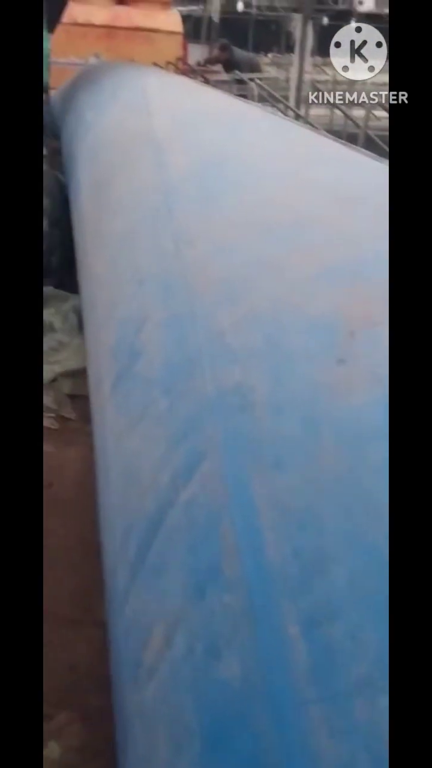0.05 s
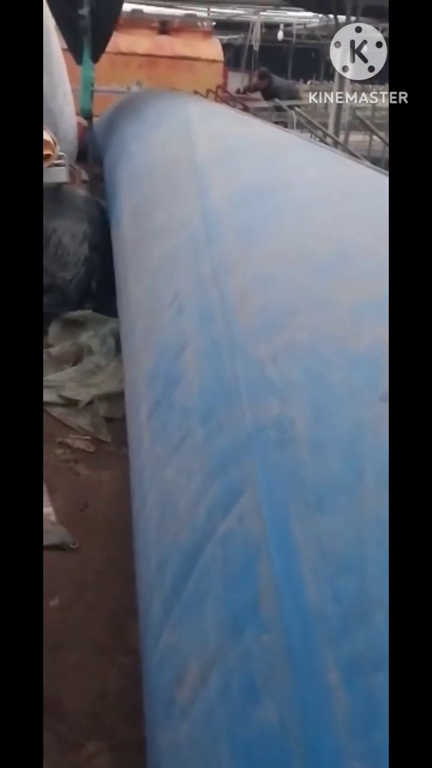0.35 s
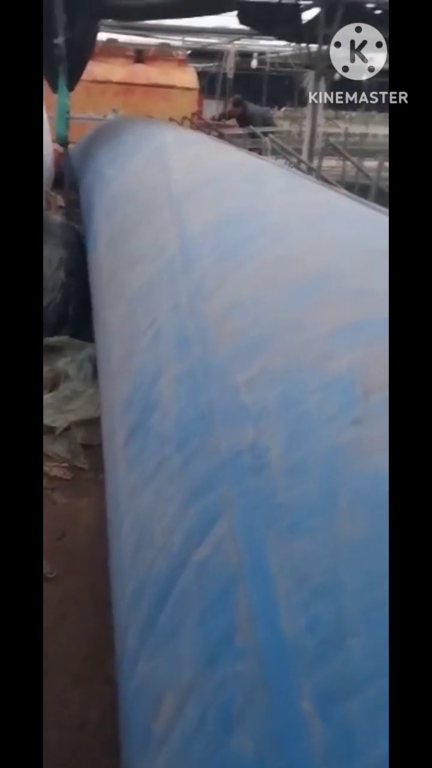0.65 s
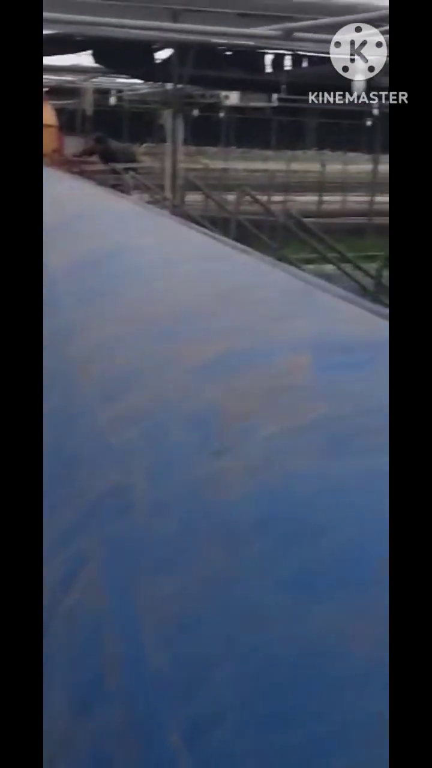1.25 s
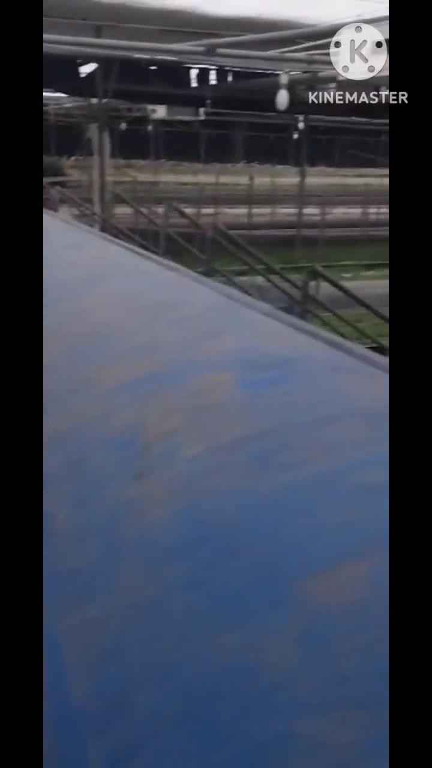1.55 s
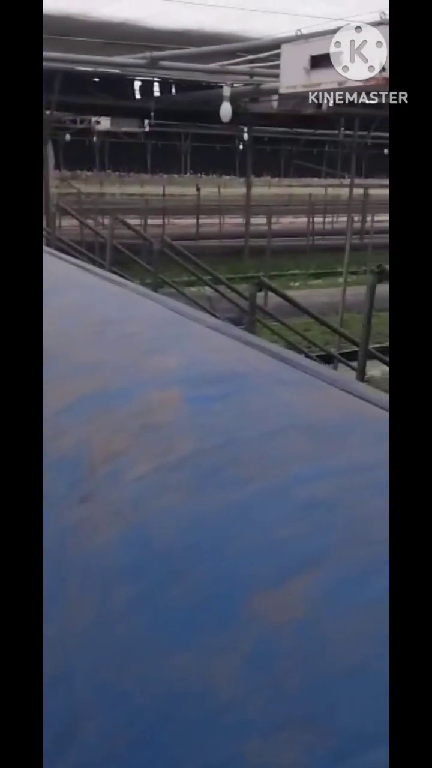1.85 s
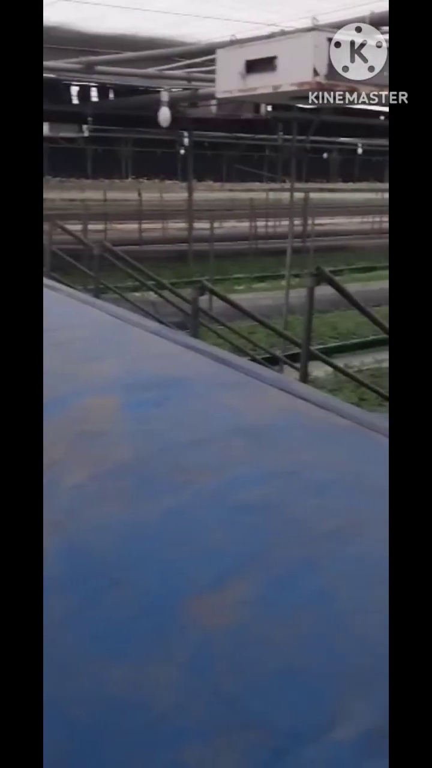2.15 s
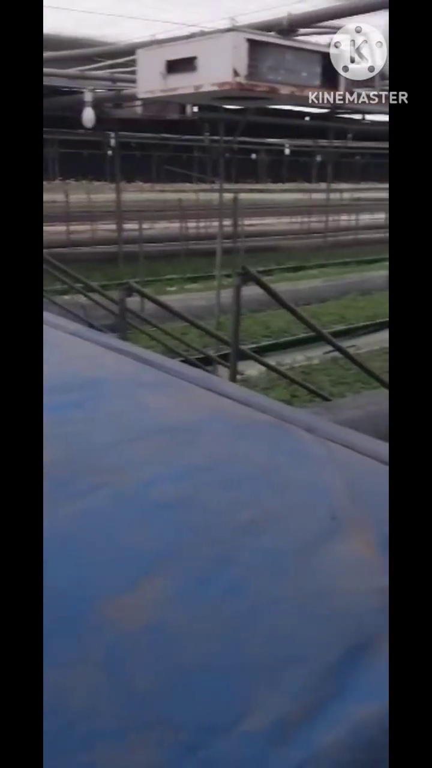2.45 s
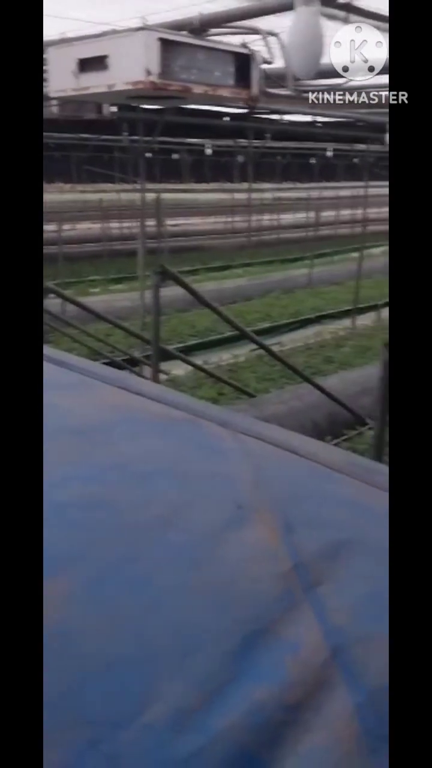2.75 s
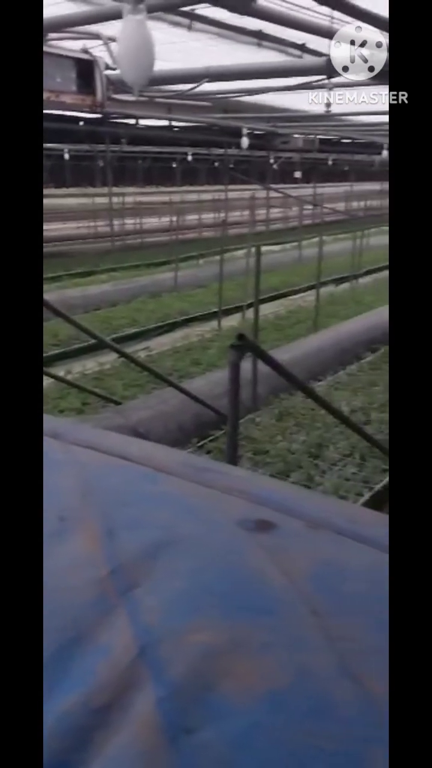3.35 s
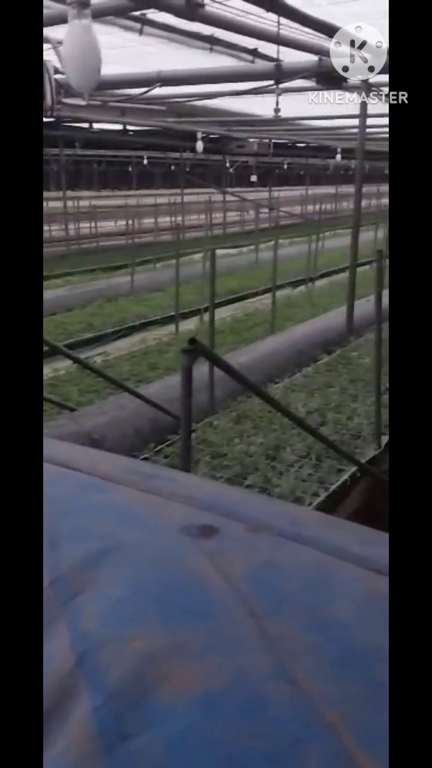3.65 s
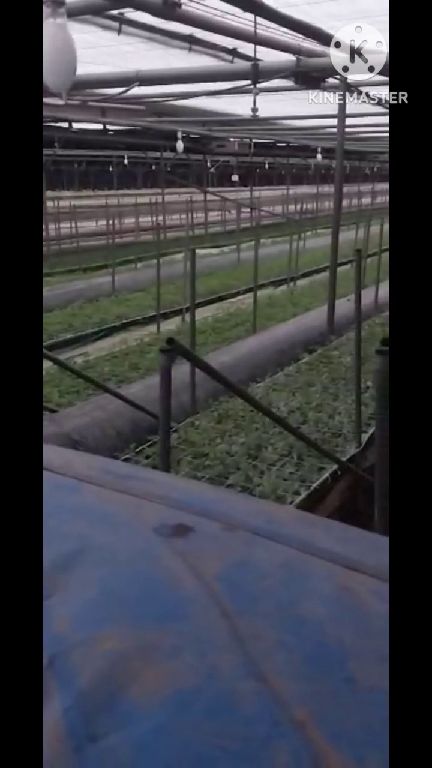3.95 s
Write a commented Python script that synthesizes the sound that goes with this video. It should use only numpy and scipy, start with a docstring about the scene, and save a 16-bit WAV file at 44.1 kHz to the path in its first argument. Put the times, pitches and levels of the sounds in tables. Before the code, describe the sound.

A low, throbbing machine drone fills a large greenhouse throughout, with a thin motor hum, wide fan rush and faint hiss. Short splashy spurts of water come evenly, about three a second, until 1.3 seconds. They pause, then crowd together from about 2.1 seconds to the end at 4. Occasional ticks and light clacks accompany them, with faint thumps near 0.9 and 3 seconds.

```python
"""A low machine drone throbs in a large greenhouse, with a thin motor hum and a wide rush of fan air.
The drone is one wavering tone inside the boom of the hall; the hum is three orders of a turning shaft.
Short splashy swishes of spray and ringing droplets, as of spurting water, come evenly at first,
pause, then crowd together. Now and then a tick, a light clack or a faint thump comes with one,
each a short burst of noise in its own band. A faint steady hiss sits on top."""
import sys
import numpy as np
from scipy import signal
from scipy.fft import rfft, irfft
from scipy.io import wavfile
from scipy.ndimage import uniform_filter1d

SR = 44100
rng = np.random.default_rng(int(sys.argv[2]) if len(sys.argv) > 2 else 0)


def file_out(sig):
    """Save sig as 16-bit WAV at sys.argv[1]."""
    # one column per channel
    cols = np.atleast_2d(sig).T
    # limit, then scale
    lim = np.clip(cols, -1, 1)
    pcm = np.round(lim * 32767).astype(np.int16)
    wavfile.write(sys.argv[1], SR, pcm)


N = 176400
T = np.arange(N) / SR
FREQS = np.fft.rfftfreq(N, 1 / SR)


def amp(db):
    """Decibels to gain."""
    return 10 ** (np.asarray(db) / 20)


def unit(x):
    """Scales to rms 1."""
    return x / np.sqrt(np.mean(x ** 2) + 1e-20)


def automation(points, t=T):
    """Draws straight lines between breakpoints in time."""
    return np.interp(t, *np.transpose(points))


def over_spectrum(points):
    """Draws straight lines between breakpoints in log frequency."""
    hz, value = np.transpose(points)
    return np.interp(np.log(FREQS + 1), np.log(hz + 1), value)


def wander(rate_hz):
    """Smooth random modulation of rms 1, rolled off above the given rate."""
    return unit(irfft(rfft(rng.standard_normal(N)) * (FREQS > 0) / (1 + (FREQS / rate_hz) ** 4), N))


def stereo_spectra(correlation):
    """Left and right noise spectra, as alike at each frequency as the table says."""
    shape = (2, len(FREQS))
    left, other = rng.standard_normal(shape) + 1j * rng.standard_normal(shape)
    alike = np.clip(over_spectrum(correlation), -1, 1)
    return np.array([left, alike * left + np.sqrt(1 - alike ** 2) * other])


def panned(x, left_db):
    """Pans a sound by its left minus right level."""
    return x * amp(left_db * np.array([[.5], [-.5]]))


def swell(peak_s, attack_s, decay_s):
    """An exponential rise and fall around a peak; attack and decay are time constants."""
    return np.exp(-abs(T - peak_s) / np.where(T < peak_s, attack_s, decay_s))


def knocks(hits, band_hz, attack_s, decay_s):
    """Short dead blows: noise in one band that starts quickly and dies away."""
    bandpass = signal.butter(2, band_hz, "band", fs=SR, output="sos")
    envelope = sum(amp(db) * swell(peak_s, attack_s, decay_s) for peak_s, db in hits)
    return envelope * unit(signal.sosfilt(bandpass, rng.standard_normal(N)))


# The drone's throb. Each row: time in seconds, level in dB before the trim.
DRONE_THROB = [(0,-38),(.03,-15.5),(.1,-33),(.17,-34),(.21,-14),(.25,-23),(.31,-38),(.39,-16),(.42,-36),(.5,-19),(.54,-32),(.6,-39),(.69,-19),(.75,-22),(.8,-14.5),(.84,-25.5),(.88,-21),(.92,-35),(1.04,-17.5),(1.1,-37),(1.14,-16),(1.2,-14.5),(1.3,-22.5),(1.35,-39),(1.4,-17.5),(1.54,-21.5),(1.6,-30),(1.67,-28.5),(1.73,-18.5),(1.82,-17),(1.87,-27),(1.9,-18),(1.96,-16),(2.06,-25.5),(2.18,-15.5),(2.22,-23.5),(2.25,-18),(2.32,-16),(2.38,-28),(2.43,-14.5),(2.49,-17),(2.52,-26),(2.58,-24),(2.63,-17.5),(2.67,-23),(2.71,-39),(2.76,-19),(2.81,-29),(2.86,-18),(2.91,-40),(2.96,-27),(3.0,-34),(3.04,-21.5),(3.12,-20.5),(3.17,-18.5),(3.21,-27.5),(3.26,-23.5),(3.35,-18),(3.4,-28),(3.61,-23.5),(3.66,-32),(3.72,-22.5),(3.78,-22.5),(3.82,-34),(3.91,-18),(4,-39)]
# The drone's waver. Each row: time in seconds, pitch in Hz.
DRONE_PITCH = [(0,110),(.2,112.8),(.48,114.1),(.58,109),(.7,114.6),(.85,104.6),(.96,112.8),(1.07,111.1),(1.15,106.2),(1.3,106.8),(1.48,106),(1.75,106.5),(1.88,109.7),(1.98,107.2),(2.05,112.7),(2.14,108),(2.55,108.8),(2.8,107.6),(3.0,106.7),(3.13,111.1),(3.22,107.2),(3.34,112.1),(3.45,106.1),(3.6,108.6),(3.73,104.6),(3.88,110.6)]


def drone(trim_db=.04, octave_db=-29.5, boom_hz=115, boom_width_hz=24, boom_db=-41):
    """One low tone throbs and wavers while the hall booms around it in a narrow band of noise."""
    phase = 2 * np.pi * np.cumsum(automation(DRONE_PITCH)) / SR
    tone = np.sqrt(2) * (np.sin(phase) + amp(octave_db) * np.sin(2 * phase))
    resonance = 1 / (1 + (2 * (FREQS - boom_hz) / boom_width_hz) ** 2)
    boom = unit(irfft(rfft(rng.standard_normal(N)) * resonance, N))
    return amp(automation(DRONE_THROB) + trim_db) * tone + amp(boom_db) * boom


# The hum's partials. Each row: multiple of the shaft rate, level in dB before the fader.
SHAFT_ORDERS = [(1,-39.5),(2,-38.5),(3,-51.5)]
# The fader ride on the whole hum. Each row: time in seconds, gain in dB.
HUM_FADER = [(0,9.5),(.15,-4.5),(.65,5),(1.05,3.5),(1.35,-1),(1.6,-10.5),(1.9,-8),(2.15,3.5),(2.4,-1),(2.82,5),(3.2,-1),(3.4,1),(3.6,3.5),(4,-4)]


def motor_hum(shaft_hz=145.1, speed_drift=.00088, waver_db=1):
    """Orders of a turning shaft, each wavering in level on its way through the hall."""
    speed_hz = shaft_hz * (1 + speed_drift * wander(rate_hz=4.9))
    phase = 2 * np.pi * np.cumsum(speed_hz) / SR
    hum = 0
    for order, db in SHAFT_ORDERS:
        waver = amp(waver_db * wander(rate_hz=1.1))
        hum += amp(db) * unit(waver * np.sin(order * phase + 2 * np.pi * rng.random()))
    return amp(automation(HUM_FADER)) * hum


# The air's EQ. Each row: frequency in Hz, relative spectral level in dB.
AIR_EQ = [(20,-33),(32,-28),(48,-7),(80,-4.5),(110,6),(137,5),(160,-8.5),(185,-1.5),(210,1.5),(255,0.4),(305,-4.5),(410,-10),(470,-6),(570,-14),(830,-12),(1300,-18.5),(2100,-22.5),(3000,-28.5),(4200,-30.5),(5600,-35.5),(7400,-39),(8500,-48.5),(10500,-43),(12500,-42.5),(15000,-51)]
# Narrow lows, wide highs. Each row: frequency in Hz, left-right correlation (1 is mono).
AIR_CORRELATION = [(30,.97),(60,.99),(130,.99),(290,.9),(640,.64),(1400,.38),(3000,0),(15000,.05)]
# Where the air leans. Each row: frequency in Hz, left minus right in dB.
AIR_BALANCE = [(100,2),(350,-3.5),(690,1.5),(1300,-1.5),(4400,-2.5),(14000,-0.5)]
# The ride on the air's high shelf. Each row: time in seconds, shelf gain in dB.
AIR_TREBLE = [(0,3),(.6,2),(.75,1),(1,3),(1.45,0),(1.95,-0.5),(2.2,3),(2.9,2.5),(4,2.5)]


def fan_air(level_db=-26, shelf_hz=2150, patchy_db=.76, flicker_db=.5):
    """Wide fan noise, slightly patchy, whose treble flickers, sinks and returns."""
    lean_db = over_spectrum(AIR_BALANCE) / 2
    eq = amp(over_spectrum(AIR_EQ) + np.array([lean_db, -lean_db]))
    air = irfft(stereo_spectra(AIR_CORRELATION) * eq, N)
    hz, times, frames = signal.stft(air, SR, nperseg=512)
    # Random gains, smeared over 8 frames and 6 bins, make the patches.
    speckle = rng.standard_normal((len(times), len(hz)))
    patches = unit(uniform_filter1d(uniform_filter1d(speckle, size=8, axis=0), size=6, axis=1)).T
    shelf = (hz ** 2 / (hz ** 2 + shelf_hz ** 2))[:, None]
    treble_db = automation(AIR_TREBLE, times) + flicker_db * rng.standard_normal(len(times))
    frames = frames * amp(patchy_db * patches + shelf * treble_db)
    return amp(level_db) * unit(signal.istft(frames, SR)[1][:, :N])


def hiss(level_db=-60.5, band_hz=(10100, 14400)):
    """Faint, even top-end hiss, unrelated in each ear and stronger on the right."""
    bandpass = signal.butter(3, band_hz, "band", fs=SR, output="sos")
    noise = unit(signal.sosfilt(bandpass, rng.standard_normal((2, N))))
    return panned(amp(level_db) * noise, left_db=-8)


def droplets(drops_per_s=900, spread_db=7, range_hz=(1216, 7100), pitches=24, decay_cycles=7.8):
    """Drops of many sizes patter as tiny rings, each pitch with a random phase in each ear."""
    patter = np.zeros((2, N))
    for hz in np.geomspace(*range_hz, pitches):
        cycles = T[:1200] * hz
        lands = rng.random(N) < drops_per_s / pitches / SR
        sizes = amp(spread_db * np.minimum(rng.exponential(1, N), 3))
        for ear in patter:
            ring = np.exp(-cycles / decay_cycles) * np.sin(2 * np.pi * (cycles + rng.random()))
            ear += signal.oaconvolve(lands * sizes, ring)[:N]
    return unit(patter)


# The swish cues. Each row: peak time in seconds, level in dB, attack in seconds, decay in seconds,
# brightness in dB (half lifts the treble, half cuts the body).
SWISH_CUES = [(.089,-34.5,0.011,0.017,1),(0.363,-33,0.014,0.027,1),(.625,-41,.03,0.017,10),(0.657,-31.5,0.01,0.012,0),(0.945,-30.5,0.007,0.0098,2),(1.24,-32,0.0057,0.013,-2.5),(1.272,-44,0.0056,.01,7),
              (2.094,-29,0.011,0.015,-3),(2.135,-40,0.032,0.02,-12),(2.348,-31,0.028,0.031,-2.5),(2.494,-33.5,.006,0.018,1),(2.538,-31.5,0.0069,0.021,-13.5),(2.601,-35.5,0.022,0.038,-9),(2.726,-35,0.013,0.016,-8),
              (2.784,-29,0.017,0.014,-3),(2.812,-30,0.0086,.02,-7),(2.87,-39,0.029,0.04,2),(2.921,-33,0.0046,0.019,-9),(2.952,-34.5,0.02,0.037,-3),(3.003,-30.5,0.017,0.035,-9),
              (3.205,-30.5,0.0049,0.014,-8),(3.238,-30.5,.012,0.037,-7),(3.29,-37,0.0042,0.011,-6),(3.375,-32.5,0.043,0.04,-7.5),(3.43,-26.5,0.0094,0.012,-7),(3.48,-40,0.037,0.032,-1),
              (3.628,-29.5,0.021,0.019,-7),(3.681,-30.5,0.017,0.033,-6),(3.716,-34.5,0.0079,0.022,3),(3.80,-37,.03,0.028,-8),(3.852,-26.5,0.019,0.018,-3),(3.905,-33,0.021,0.043,-7)]
# The spray's EQ. Each row: frequency in Hz, relative spectral level in dB.
SPRAY_EQ = [(100,-22),(330,5),(600,1),(1100,-1.5),(2100,-0.9),(3200,-2),(5000,-4.5),(7200,-11.5),(8600,-22.5),(11000,-16),(15000,-22)]
# The spray's stereo image. Each row: frequency in Hz, left-right correlation (1 is mono).
SPRAY_CORRELATION = [(300,0.99),(1300,0.26),(3000,0.6),(6500,0.14),(12000,0.18)]
# The pan swings left, then back to centre. Each row: time in seconds, left minus right in dB.
SWISH_BALANCE = [(0,0),(.65,3.5),(2.1,2),(2.8,2),(3.3,0),(4,0)]


def swishes(grain_db=2, droplets_db=-7.5, crossover_hz=2800, left_delay_s=.00014):
    """Grainy spray and droplets swell and fade quickly with each spurt, some bright, some dull."""
    delay = np.exp(-2j * np.pi * FREQS * np.array([[left_delay_s], [0]]))
    noise = irfft(stereo_spectra(SPRAY_CORRELATION) * delay, N)
    grain = amp(grain_db * wander(rate_hz=650))
    spray = unit(irfft(rfft(noise * grain) * amp(over_spectrum(SPRAY_EQ)), N))
    water = unit(spray + amp(droplets_db) * droplets())
    body = irfft(rfft(water) / (1 + (FREQS / crossover_hz) ** 4), N)
    treble = water - body
    spurts = 0
    for band, tilt in ((body, -.5), (treble, .5)):
        # Overlapping swishes add in power.
        power = sum((amp(db + tilt * bright_db) * swell(peak_s, attack_s, decay_s)) ** 2
                    for peak_s, db, attack_s, decay_s, bright_db in SWISH_CUES)
        spurts += np.sqrt(power) * band
    return panned(spurts, automation(SWISH_BALANCE))


# The tick cues. Each row: peak time in seconds, level in dB.
TICK_CUES = [(.656,-49),(.947,-46),(2.302,-37),(3.205,-41),(3.428,-42),(3.497,-35)]


def ticks():
    """Thin ticks: the briefest blows, all top end."""
    return knocks(TICK_CUES, band_hz=(4500, 14200), attack_s=.00027, decay_s=.001)


# The clack cues. Each row: peak time in seconds, level in dB.
CLACK_CUES = [(.658,-35),(.945,-36),(2.535,-37),(3.431,-34),(3.63,-39),(3.682,-40)]


def clacks():
    """Light clacks: dry blows in the midrange."""
    return knocks(CLACK_CUES, band_hz=(1350, 2150), attack_s=.0022, decay_s=.0045)


# The thump cues. Each row: peak time in seconds, level in dB.
THUMP_CUES = [(.945,-24.5),(3.0,-31)]


def thumps():
    """Faint thumps: soft, dull blows in the low mids."""
    return knocks(THUMP_CUES, band_hz=(200, 650), attack_s=.004, decay_s=.016)


def scene():
    """The mix: machines a little to the right, blows in the centre, air and swishes spread wide."""
    machines = panned(drone() + motor_hum(), left_db=-1.73)
    blows = thumps() + ticks() + clacks()
    return machines + blows + fan_air() + hiss() + swishes()


def record(dry):
    """A steep high cut on the whole mix."""
    cutoff_hz = 15400
    lowpass = signal.firwin(511, cutoff_hz, window=("kaiser", 9), fs=SR)
    return signal.oaconvolve(dry, lowpass[None], "same")


dry = scene()
out = record(dry)
file_out(out)
```